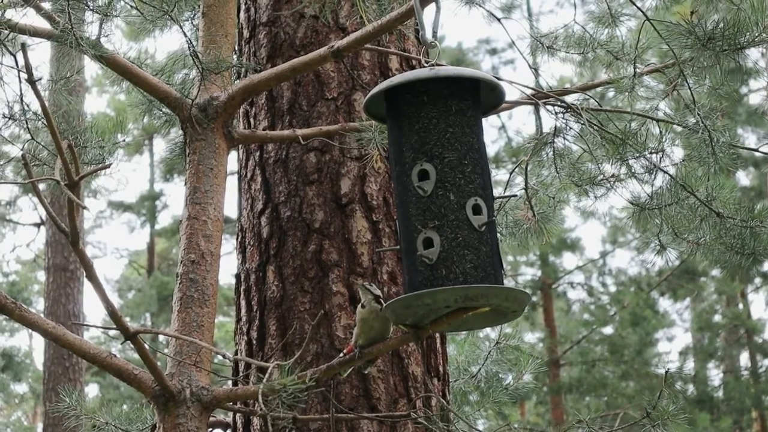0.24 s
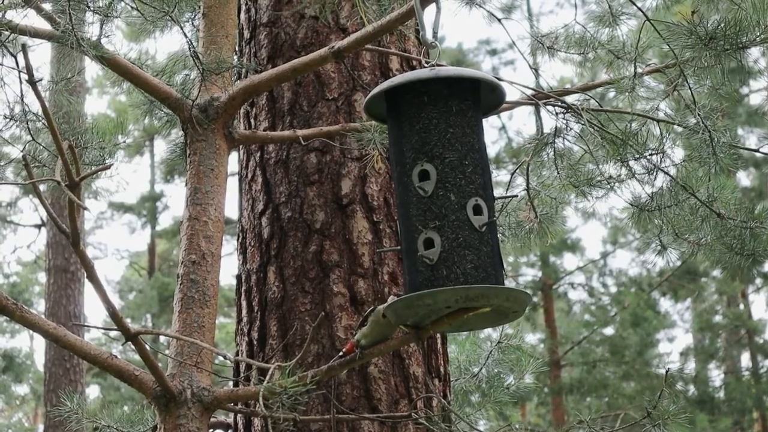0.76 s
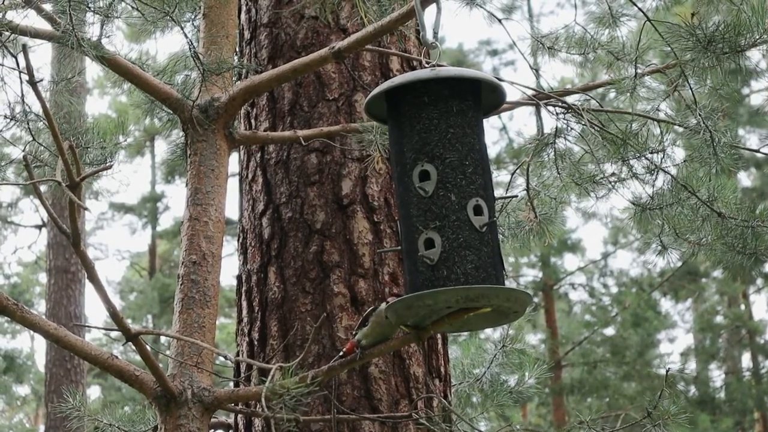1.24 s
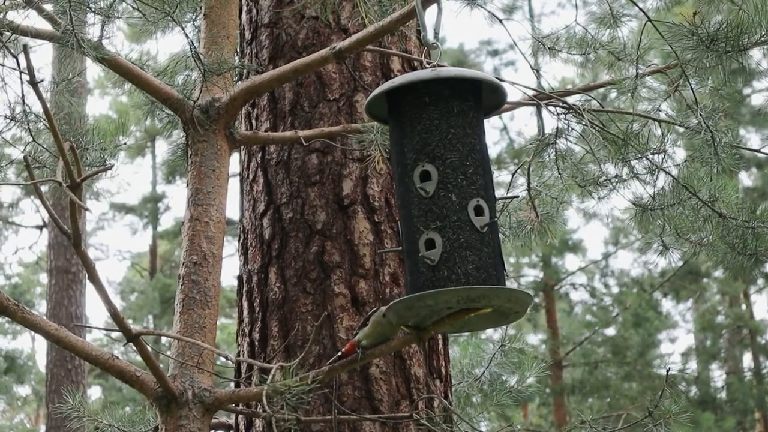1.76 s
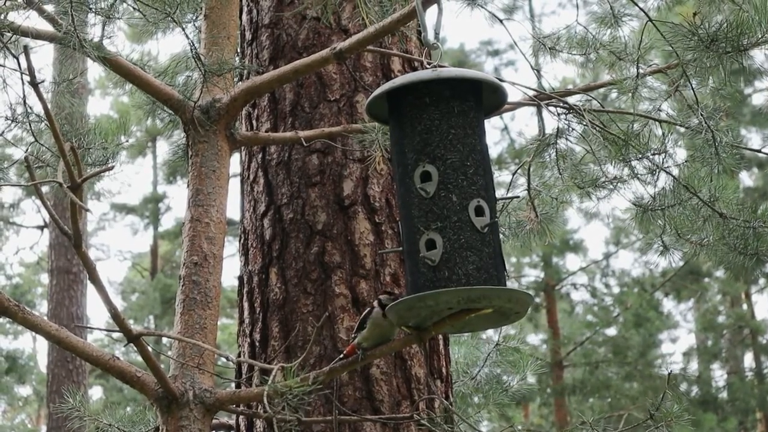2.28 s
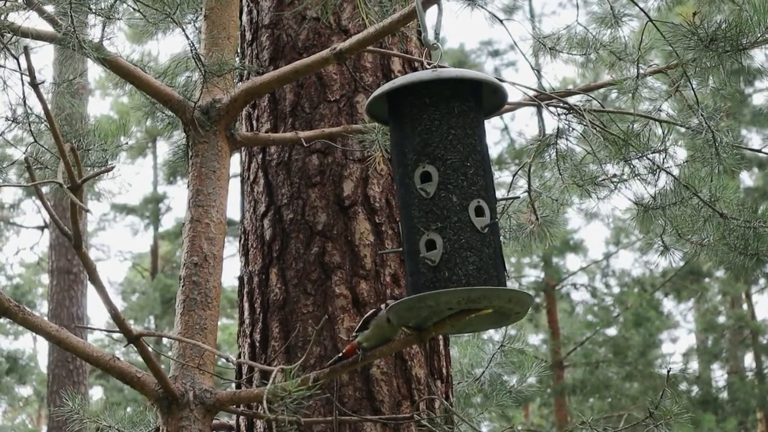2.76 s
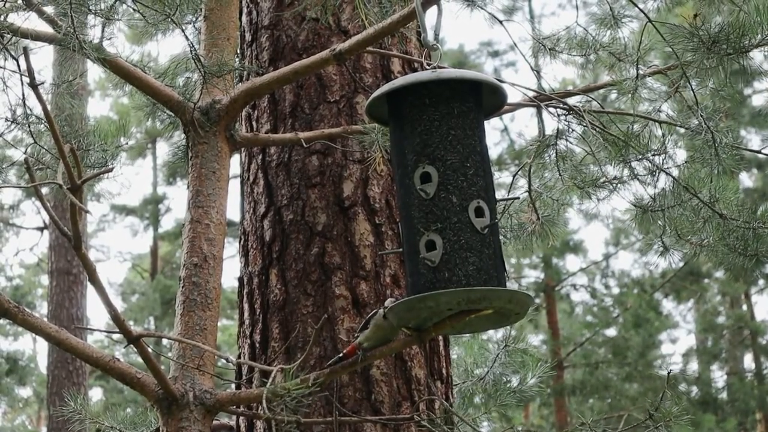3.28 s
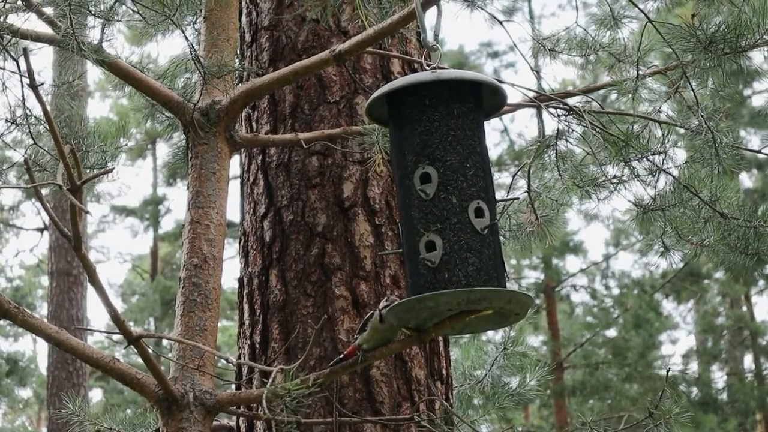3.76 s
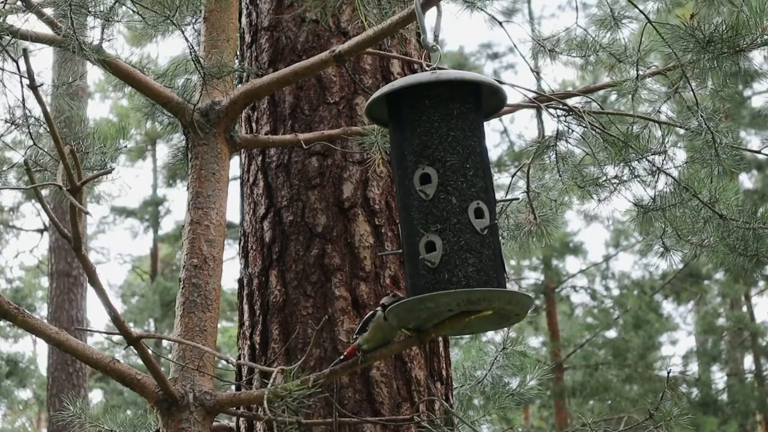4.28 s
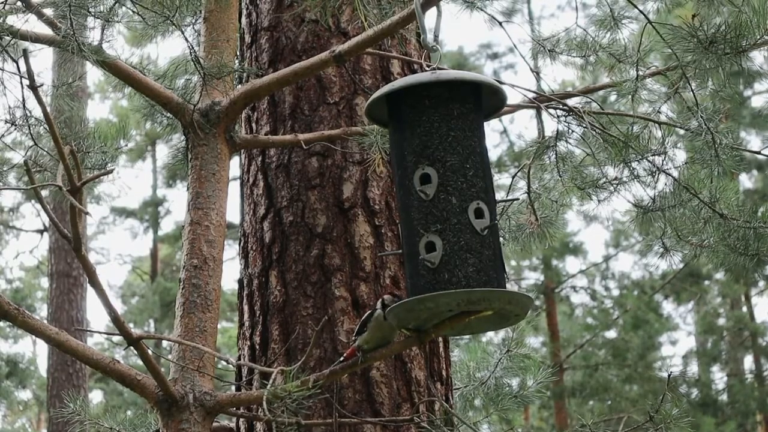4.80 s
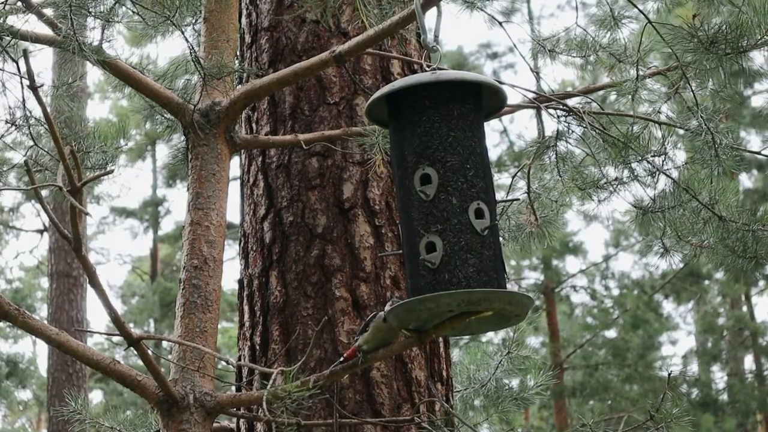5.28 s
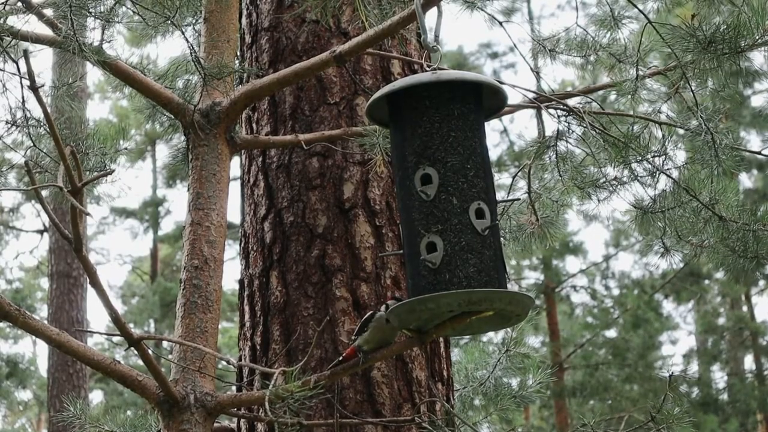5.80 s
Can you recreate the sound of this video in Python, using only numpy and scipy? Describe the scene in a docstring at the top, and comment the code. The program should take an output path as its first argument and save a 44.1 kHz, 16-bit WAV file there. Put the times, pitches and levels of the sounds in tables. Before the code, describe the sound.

Close by and slightly to the right, a woodpecker digs in a hanging seed feeder. After a few faint, high chirps from small birds deeper in the trees and a low thump of wind on the microphone, the pecking begins: short rustles with sharp, dry snaps of husks and a few light knocks on the tray. The bursts come unevenly, with brief pauses, over a quiet, distant forest hush.

```python
"""Woodpecker at a pine-wood feeder

Close to the microphone, a little to the right, a woodpecker clings under a hanging feeder and digs
for seeds. Each dig swells to a rustle, then husks snap and crumble, ringing the feeder faintly.
Small birds chip deeper in the trees over a distant hush; puffs of air thud on the microphone."""
import sys
import numpy as np
from scipy import signal
from scipy.fft import rfft, irfft
from scipy.io import wavfile
from scipy.ndimage import uniform_filter1d

SR = 44100
rng = np.random.default_rng(int(sys.argv[2]) if len(sys.argv) > 2 else 0)


def wav_out(sig):
    """Save sig, one row per channel (or a flat mono array), as 16-bit PCM at SR to the path in sys.argv[1]."""
    wavfile.write(sys.argv[1], SR, np.round(np.clip(np.atleast_2d(sig).T, -1, 1) * 32767).astype(np.int16))


N = 266496

# strength of the breeze at the microphone: t/s, level/dB
BREEZE = [(0, -58), (.4, -52), (.8, -57.5), (1.5, -47), (1.95, -63.5), (2.8, -71), (3.6, -63), (4.2, -62.5),
          (5.1, -57), (5.7, -58), (6.04, -55)]
# the bill digging into the seeds: hardest push t/s, level/dB, fade/s, scrape on the port/dB
DIGS = [(1.54, -58, 0.14, -60.5), (1.874, -57, 0.074, -65), (2.206, -55, 0.18, -62.5),
        (2.509, -53, 0.064, -63.5), (2.611, -59, .1, -81), (2.837, -60, 0.032, -67.5),
        (3.089, -53, 0.071, -64.5), (3.24, -60.5, 0.037, -80.5), (3.822, -61.5, .08, -76),
        (4.852, -54, 0.064, -65.5), (5.15, -53.5, 0.086, -67.5), (5.501, -53, 0.043, -62),
        (5.58, -58.5, 0.09, -72), (5.842, -54, 0.05, -58.5), (5.94, -66, 0.079, -85)]
# spectrum of a snapping husk: f/Hz, level/dB
HUSK = [(600, -47), (1800, -27), (2700, -22), (3200, -15), (4300, -6.5), (5400, -7.5), (7200, -1),
        (8700, -2.5), (10000, -0.5), (11500, -4.5), (12200, -12), (13000, -26.5), (15500, -39),
        (17000, -43)]


def gain_of(db):
    """Decibels to amplitude."""
    return 10 ** (np.asarray(db) / 20)


def unit_rms(x):
    """Scales to an rms of one."""
    return x / np.sqrt(np.mean(x ** 2) + 1e-20)


def unit_energy(x):
    """Scales to an energy of one per channel."""
    return x / np.sqrt(np.sum(x ** 2, -1, keepdims=True) + 1e-20)


def read(points, hz):
    """Reads a table on a log-frequency axis."""
    f, value = np.transpose(points)
    return np.interp(np.log(hz + 1), np.log(f + 1), value)


def add(mix, s, sound):
    """Mixes a sound in at s seconds."""
    part = mix[..., max(round(s * SR), 0):][..., :sound.shape[-1]]
    part += sound[..., :part.shape[-1]]


def coloured(x, points):
    """Filters a signal by the spectrum in a table."""
    n = x.shape[-1]
    return irfft(rfft(x) * gain_of(read(points, np.fft.rfftfreq(n, 1 / SR))), n)


def left_right(pair, side_db=0):
    """Decodes mid and side to left and right."""
    mid, side = pair
    return mid + gain_of(side_db) * np.array([-side, side])


def hush(level_db=-59.5):
    """Steady far-off noise: central in the bass, mostly wide in the treble."""
    spectrum = [(15, -40.5), (25, -16), (48, -1), (84, -6), (217, -10), (277, -14), (384, -19.5),
                (503, -18.5), (796, -14), (1230, -19), (1840, -29.5), (2160, -33), (2840, -38),
                (10100, -52), (16000, -73.5)]  # distant background: f/Hz, level/dB
    likeness = [(60, 1), (130, 1), (290, 0.83), (640, 0.61), (1400, -0.1), (3100, -0.84), (7000, 0.84),
                (15000, -1.3)]  # how alike the channels are: f/Hz, likeness
    balance = [(40, -2), (150, -1), (700, -1), (3000, -0.5), (12000, -0.5)]  # lean of the background: f/Hz, left over right/dB
    hz = np.fft.rfftfreq(N, 1 / SR)
    mid, side = (unit_rms(coloured(noise, spectrum)) for noise in rng.standard_normal((2, N)))
    correlation = np.clip(read(likeness, hz), -.9, .999)
    sign = np.array([[1], [-1]])
    channels = rfft(mid) + sign * rfft(side) * np.sqrt((1 - correlation) / (1 + correlation))
    return gain_of(level_db) * irfft(channels * gain_of(sign * read(balance, hz) / 2), N)


def breeze(left_db=-2):
    """Low lumpy rumble on the microphone that follows the strength of the air."""
    spectrum = [(15, -8), (45, 7), (100, 4), (200, -15.5), (350, -31.5), (900, -77.5)]  # wind rumble: f/Hz, level/dB
    level_db = np.interp(np.arange(N) / SR, *np.transpose(BREEZE))
    rumble = unit_rms(coloured(rng.standard_normal(N), spectrum))
    return gain_of(level_db) * rumble * gain_of([[left_db], [0]])


def weak_puffs(count=26, centre_hz=104.9, spread_octaves=0.458, length_s=0.0293, left_db=-1.5):
    """Rows for puffs(): weak ones come at random, about as strong as the breeze."""
    times = (np.arange(count) + rng.random(count)) / count * N / SR
    size, pitch = rng.standard_normal((2, count))
    db = np.interp(times, *np.transpose(BREEZE)) + 0.5 - 0.5 * size
    hz = centre_hz * 2 ** (spread_octaves * pitch)
    return [(*row, length_s, left_db) for row in zip(times, db, hz)]


def eddy(hz, length, wander=0.17):
    """A swirl of air: a few uneven low cycles, as a complex wave."""
    n = round(2 * length * SR)
    drift = np.interp(np.linspace(0, 7, n), np.arange(8), rng.standard_normal(8))
    turns = np.cumsum(hz * np.exp(wander * drift)) / SR
    return unit_rms(np.hanning(n)) * np.exp(2j * np.pi * (turns + rng.random()))


def puffs(trim_db=-0.5, push_hz=45, push_level_db=-13, lead_rad_per_db=0.14):
    """Air hits the microphone: a slow push and a large eddy that breaks into smaller ones."""
    # strong puffs: middle t/s, level/dB, f/Hz, length at half height/s, left over right/dB
    strong_puffs = [(.339, -39.5, 115.6, .026, -4.5), (.452, -45, 109.3, .045, -5.5),
                    (1.04, -46, 108.4, .05, -7.5), (1.29, -41.5, 87, 0.067, -4.5),
                    (1.386, -33, 121.5, 0.028, -7.5), (1.459, -22, 120.5, 0.024, -6),
                    (1.48, -19.5, 149, .02, -8.5), (1.498, -20, 111.4, 0.022, -5.5),
                    (1.607, -33.5, 149, 0.038, -2.5), (1.796, -38, 152.2, 0.064, -2),
                    (2.285, -46.5, 113.7, 0.015, -1.5), (3.189, -39.5, 117, 0.034, -1.5),
                    (3.535, -42, 91.2, .06, -0.5), (3.81, -61.5, 249.7, 0.068, 2),
                    (4.536, -48.5, 103, 0.061, 0), (5.101, -39, 59, 0.048, 0),
                    (5.415, -33.5, 78.2, 0.052, -3), (5.481, -34, 60.2, 0.028, -1),
                    (6.026, -42.5, 80, .04, -4)]
    out = np.zeros((2, N))
    for s, db, hz, length, left_db in list(strong_puffs) + weak_puffs():
        # from the side, a puff reaches one capsule weaker and earlier
        left = gain_of(left_db) * np.exp(-1j * lead_rad_per_db * left_db)
        capsules = gain_of(db + trim_db) * np.array([[left], [1]])
        parts = [(hz, 0), (hz * 1.6, -15), (hz * 2.5, -32), (push_hz, push_level_db)]
        wave = sum(gain_of(part_db) * eddy(part_hz, length) for part_hz, part_db in parts)
        add(out, s - length, (capsules * wave).real)
    return out


def bird_chips(chip_fall=.16, thin_fall=0.034, top_at=.22, quaver=0.016, half_echo_db=-69.5):
    """Small birds whistle notes that arch and slide down; the farther the bird, the more echo."""
    chips = [(.159, 0.042, -62, 7840, -60), (.347, 0.038, -78, 4790, -40), (0.52, 0.03, -81, 4800, -44),
             (0.599, 0.043, -53, 7960, -60), (0.628, 0.0075, -59, 8170, -60),
             (0.898, .022, -68.5, 5480, -11), (4.774, 0.062, -63, 7800, -60)]  # falling chips: t/s, length/s, level/dB, top f/Hz, overtone/dB
    thin_calls = [(.13, 0.067, -96, 9200), (0.367, 0.099, -96.5, 9300), (0.534, 0.079, -104, 9300),
                  (2.655, .06, -91, 8450)]  # nearly level calls far off: t/s, length/s, level/dB, top f/Hz
    calls = [(*row, chip_fall) for row in chips] + [(*row, -np.inf, thin_fall) for row in thin_calls]
    direct, scattered = np.zeros((2, N))
    for s, length, db, top_hz, overtone_db, fall in calls:
        progress = np.linspace(0, 1, round(length * SR))
        arch = 1 - fall * abs((progress - top_at) / (1 - top_at)) ** 1.3
        waver = unit_rms(uniform_filter1d(rng.standard_normal(len(progress)), size=30))
        phase = 2 * np.pi * np.cumsum(top_hz * arch * (1 + quaver * waver)) / SR
        whistle = np.sin(phase) + gain_of(overtone_db) * np.sin(2 * phase)
        note = gain_of(db) * unit_rms(np.sin(np.pi * progress ** 2.5) * whistle)
        echo_db = min(0.6 * (half_echo_db - db), 8)  # fainter calls are farther off
        add(direct, s, note)
        add(scattered, s, gain_of(echo_db) * note)
    return direct + tree_echo(scattered[None])


def tree_echo(x, echoes_per_s=2500, onset_s=0.0026):
    """Sparse echoes off trunks and branches, the treble dying first."""
    decay = [(2000, 0.41), (5000, 0.1), (9000, 0.18), (14000, 0.11)]  # reverberation of the wood: f/Hz, t60/s
    taps = rng.standard_normal((2, SR // 2)) * (rng.random((2, SR // 2)) < echoes_per_s / SR)
    hz, t, bands = signal.stft(taps, SR, nperseg=256)
    bands *= gain_of(-60 * t / read(decay, hz)[:, None]) * (1 - np.exp(-t / onset_s))
    response = unit_energy(signal.istft(bands, SR, nperseg=256)[1])
    return signal.fftconvolve(x, response, axes=1)[:, :N]


def push_db(after_s, fade_s, swell_s=0.048, range_db=14.5):
    """Level of a dig against its hardest push: it swells, then fades."""
    return range_db * np.minimum(after_s / swell_s, -after_s / fade_s)


def slips(per_s, spread_db):
    """Friction: a dense train of tiny slips of unequal size."""
    size = gain_of(spread_db * np.minimum(rng.exponential(1, N), 4))
    return size * rng.choice([-1, 1], N) * (rng.random(N) < per_s / SR)


def husk_click(tilt_db_per_octave):
    """One minimum-phase click of a husk, its treble tilted up or down."""
    hz = abs(np.fft.fftfreq(512, 1 / SR))
    octaves = np.log2(np.clip(hz, 3600, 11000) / 8000)
    log_gain = np.log(gain_of(read(HUSK, hz) + tilt_db_per_octave * octaves))
    return np.fft.ifft(np.exp(np.conj(signal.hilbert(log_gain)))).real


def digging(rustle_db=-3, rest_db=-20, scrape_db=-1, scrape_lead_s=0.054, scatter_s=0.0048):
    """Seeds rub under the bill until they rest, and the bill scrapes the port; the tray scatters both."""
    rim_spectrum = [(1500, -54.5), (2800, -25.5), (3200, 3), (3900, -0.5), (4800, -12), (10000, -18),
                    (13000, -47.5)]  # bill on the rim of the port: f/Hz, level/dB
    t = np.arange(N) / SR
    push, rub = np.zeros((2, N))
    for s, db, fade_s, rub_db in DIGS:
        push += gain_of(db) * np.maximum(gain_of(push_db(t - s, fade_s)) - gain_of(rest_db), 0)
        rub += gain_of(rub_db) * np.interp(t - s + scrape_lead_s, [0, 0.016, 0.12], [0, 1, 0])
    seeds = signal.fftconvolve(slips(per_s=2000, spread_db=3.5), husk_click(-4.5))[:N]
    rim = coloured(slips(per_s=1500, spread_db=4.5), rim_spectrum)
    force = gain_of(rustle_db) * push * unit_rms(seeds) + gain_of(scrape_db) * rub * unit_rms(rim)
    out, hop = np.zeros((2, N)), SR // 50
    for at in range(0, N, hop):  # the path changes as the bill moves
        scatter = unit_energy(rng.standard_normal((2, hop)) * np.exp(-t[:hop] / scatter_s))
        add(out, at / SR, signal.fftconvolve(force[None, at:at + hop], scatter, axes=1))
    return left_right(out)


def crumbs(count=5, window_s=(-.03, 0.099), trim_db=-0.5, spread_db=2.5, tilt_spread=6):
    """Rows for husk_cracks(): each dig shakes loose bits onto the tray, as hard as it pushes."""
    rows = []
    for s, db, fade_s, _ in DIGS:
        after_s = rng.uniform(*window_s, count)
        size, tilt = rng.standard_normal((2, count))
        level_db = db + push_db(after_s, fade_s) + trim_db + spread_db * size
        rows += zip(s + after_s, level_db, tilt_spread * tilt)
    return rows


def feeder_response(scatter_db=-1.5, scatter_s=.003, ring_db=-7):
    """The feeder's answer to a snap, as mid and side: direct tick, scatter off tray and tube, ring."""
    modes = [(3280, -11, .03), (4332, -7, .07), (5508, -12, .04), (6108, -8, .04), (7096, -1, .03),
             (7650, -3, .025), (7970, -2, .025), (9334, -3, .02), (9950, 0, .03), (10500, -3, .02),
             (11280, 0, .025), (11740, -5, .03)]  # ringing of the feeder: f/Hz, level/dB, t60/s
    t = np.arange(SR // 8) / SR
    tick = np.eye(2, len(t))  # the side comes one sample after the mid
    scatter = rng.standard_normal((2, len(t))) * np.exp(-t / scatter_s)
    strikes = rng.standard_normal((len(modes), 2, 2, 1))  # each place of impact favours other modes
    ring = np.zeros((2, len(t)))
    for (hz, db, t60), (sine, cosine) in zip(modes, strikes):
        phase = 2 * np.pi * hz * t
        decay = gain_of(db - 60 * t / t60) / np.sqrt(t60)
        ring += decay * (sine * np.sin(phase) + cosine * np.cos(phase))
    return tick + gain_of(scatter_db) * unit_energy(scatter) + gain_of(ring_db) * unit_energy(ring)


def husk_cracks(usual_db=-44.5, splinters_per_s=3500, creak_db=-14, creak_s=0.0023):
    """Each husk creaks under the bill, gives with one snap and ends in a dying shower of splinters."""
    snaps = [(1.5192, -46, 7), (1.5295, -44.5, -1), (1.5386, -37.5, 6), (1.5417, -38.5, 6.5),
             (1.8611, -41, 3), (1.8692, -35.5, 16), (1.8724, -36.5, 1), (2.2085, -49, -2),
             (2.2128, -37, 3.5), (2.2462, -43, -1), (2.2631, -47, -1.5), (2.2852, -43.5, 3),
             (2.302, -49, 1), (2.3609, -51.5, 8), (2.3677, -52.5, 4), (2.432, -65, 7), (2.5054, -31.5, 10),
             (2.5105, -36.5, 2), (2.56, -50, 18), (2.6253, -51.5, -11.5), (2.6572, -52, -5),
             (2.838, -39.5, 6.5), (2.884, -45.5, 9.5), (2.94, -45.5, -1.5), (2.964, -54.5, -8),
             (3.0826, -41, 3.5), (3.0849, -36.5, 4), (3.092, -40, -0.5), (3.1893, -50.5, 6.5),
             (3.2255, -40.5, 20), (3.233, -50.5, 9.5), (3.3635, -58.5, 2), (3.5827, -63.5, 9.5),
             (3.7808, -57, 1), (3.804, -54, 5), (3.809, -46, 2), (3.813, -44.5, 9), (3.8175, -51.5, 4.5),
             (3.9305, -68.5, 18.5), (4.846, -48, 2.5), (4.8572, -45.5, 2.5), (4.8857, -54.5, 2),
             (4.9393, -55.5, 9), (5.1498, -31.5, 9.5), (5.1535, -38.5, -5.5), (5.489, -49, -5),
             (5.4961, -32, 9.5), (5.5145, -46, -18), (5.5573, -51.5, -6), (5.5701, -47, 0),
             (5.5896, -52.5, -2), (5.758, -63, 0), (5.7716, -60.5, 2.5), (5.7967, -56.5, -10),
             (5.8484, -38.5, 7.5), (5.8648, -51, 0), (5.9108, -44, 14), (5.9553, -58, 4)]  # clear snaps of husks: t/s, level/dB, treble tilt/(dB per octave)
    out = np.zeros((2, N))
    t = np.arange(-SR // 100, SR // 50) / SR  # the husk gives at t = 0
    creak = gain_of(creak_db) * np.exp(-abs(t) / creak_s)
    for s, db, tilt in list(snaps) + crumbs():
        over_db = db - usual_db
        crumble_s = .0008 * np.exp(-0.04 * over_db)  # louder snaps are over sooner
        splinters = rng.standard_normal(len(t)) * (rng.random(len(t)) < splinters_per_s / SR)
        strain = np.where(t < 0, creak, np.exp(-abs(t) / (2 * crumble_s)))
        snap = signal.fftconvolve((t == 0) + strain * splinters, husk_click(tilt))
        mid_side = unit_energy(signal.fftconvolve(snap[None], feeder_response(), axes=1))
        side_db = min(-0.5 - 0.63 * over_db, 8)  # weak snaps come more by way of the tray, so wider
        gain = gain_of(db) * np.sqrt(SR // 200)  # level counted over 5 ms
        add(out, s + t[0], gain * left_right(mid_side, side_db))
    return out


def tray_knocks(partner_ratio=0.91, partner_db=-5, attack_s=0.00031):
    """The tray answers a blow of the bill with a close pair of quickly damped modes."""
    blows = [(2.6277, -48, 2650, 0.037), (5.4714, -57, 2340, 0.045), (5.4977, -46, 3130, 0.028),
             (5.5142, -46.5, 2120, 0.035)]  # bill on the tray: t/s, level/dB, f/Hz, t60/s
    out, t = np.zeros((2, N)), np.arange(SR // 10) / SR
    for s, db, hz, t60 in blows:
        phase = 2 * np.pi * hz * t
        offset = rng.uniform(-0.88, 1, (2, 1))  # each channel has its own phase
        pair = np.sin(phase + offset) + gain_of(partner_db) * np.sin(partner_ratio * phase - offset)
        add(out, s, gain_of(db - 60 * t / t60) * (1 - np.exp(-t / attack_s)) * pair)
    return out


def scene(feeder_echo_db=-12.5):
    """The feeder is close to the microphone and almost dry; the small birds sit deeper in the trees."""
    balance = [(2000, 4), (3400, 2.5), (4400, -0.5), (5700, -0.5), (7400, 0), (10000, 1), (12000, 0.5),
               (13500, 0)]  # the feeder hangs a little to the right: f/Hz, right over left/dB
    left, right = husk_cracks() + tray_knocks() + digging()
    pecking = np.array([coloured(left, [(hz, -db / 2) for hz, db in balance]),
                        coloured(right, [(hz, db / 2) for hz, db in balance])])
    echo = gain_of(feeder_echo_db) * tree_echo(pecking)
    return pecking + echo + bird_chips() + puffs() + breeze() + hush()


def record(dry, edge_hz=16000):
    """The recorder's band limit."""
    lowpass = signal.firwin(511, edge_hz, window=("kaiser", 9), fs=SR)
    return signal.oaconvolve(dry, lowpass[None], "same")


dry = scene()
out = record(dry)
wav_out(out)
```